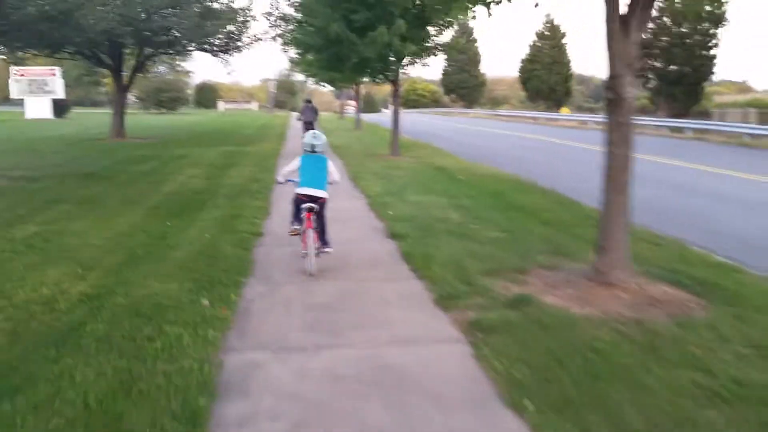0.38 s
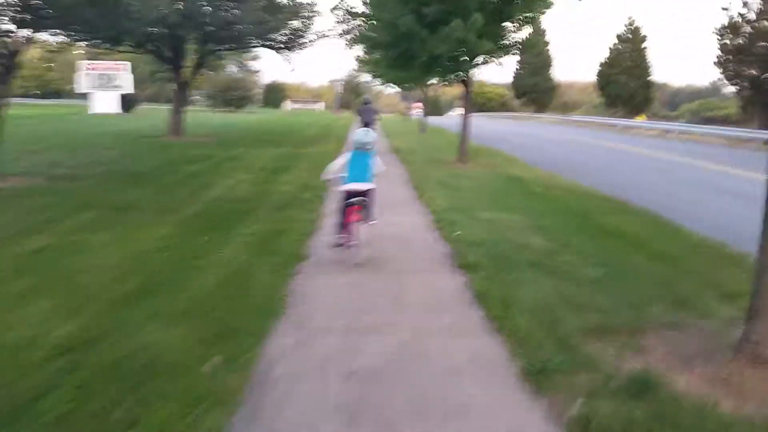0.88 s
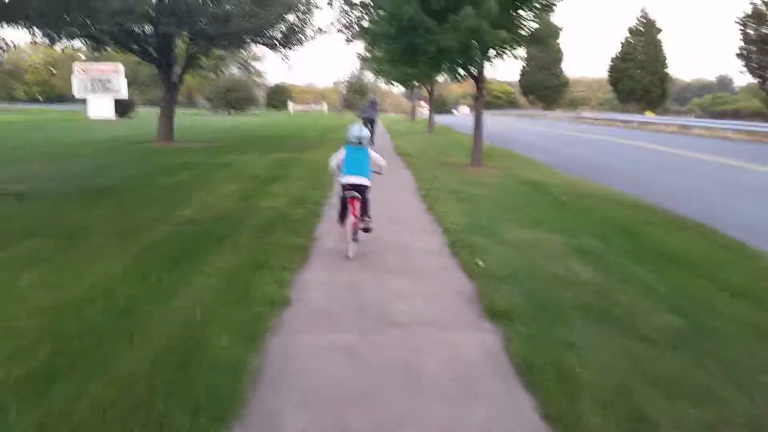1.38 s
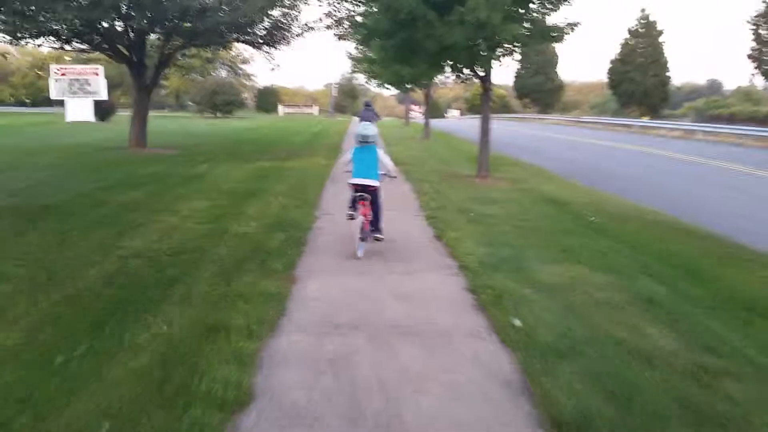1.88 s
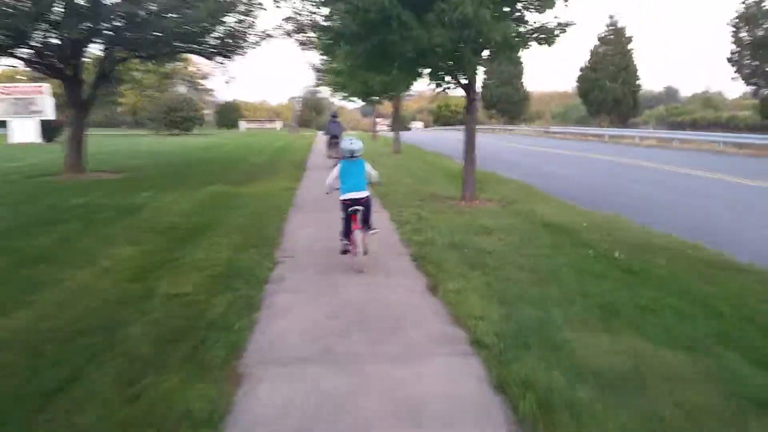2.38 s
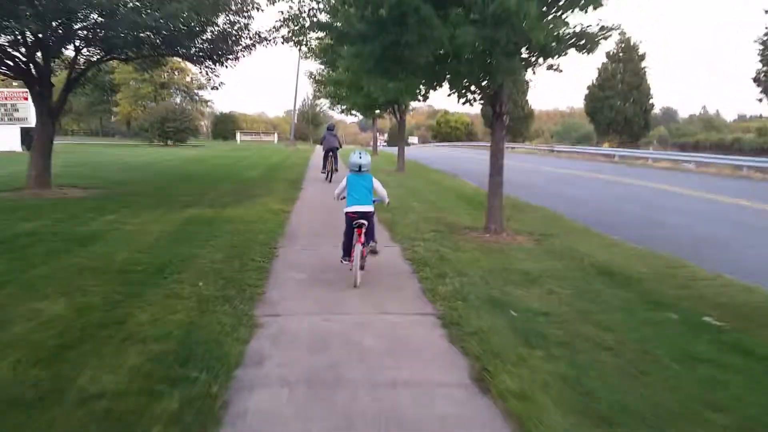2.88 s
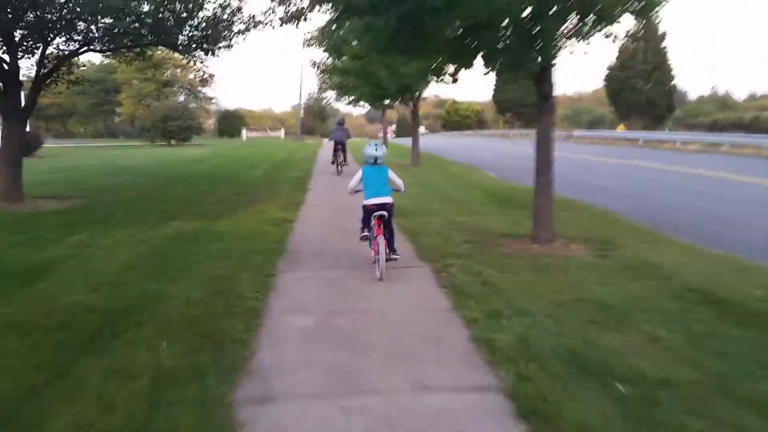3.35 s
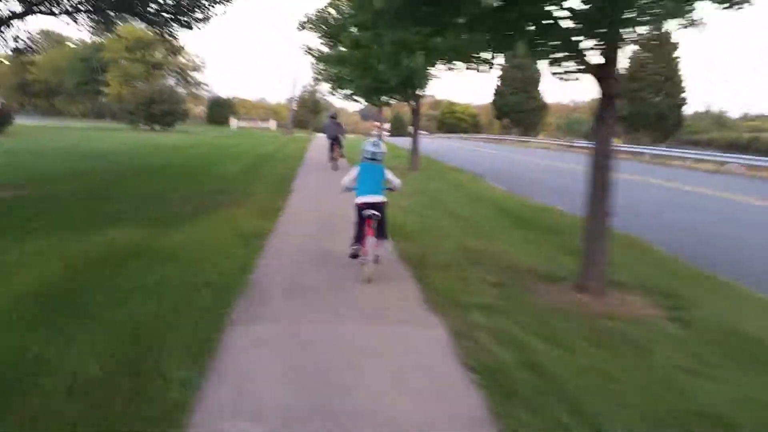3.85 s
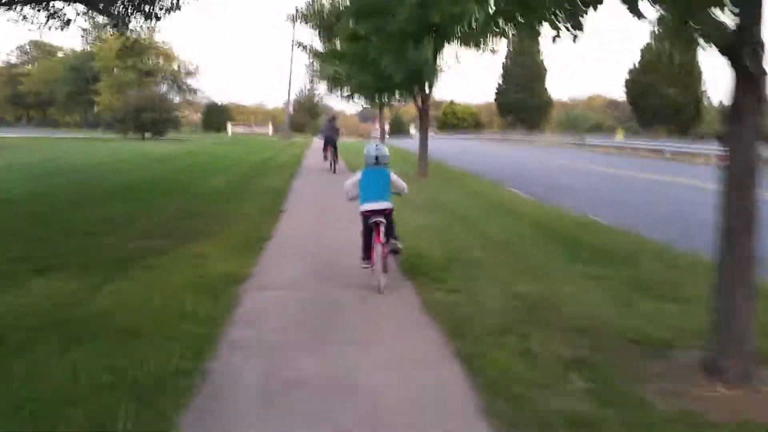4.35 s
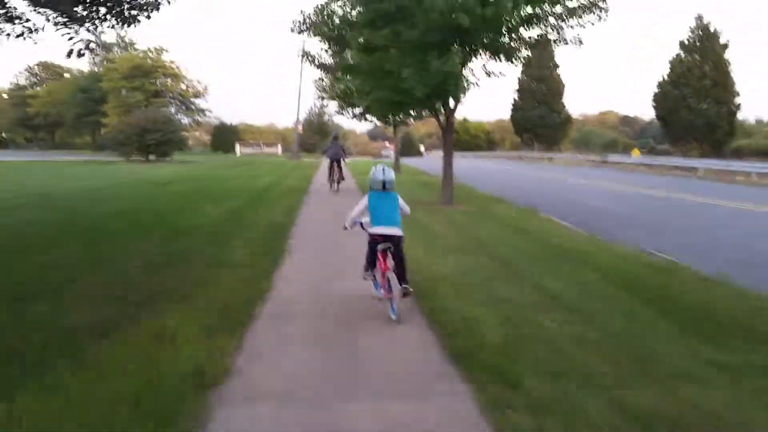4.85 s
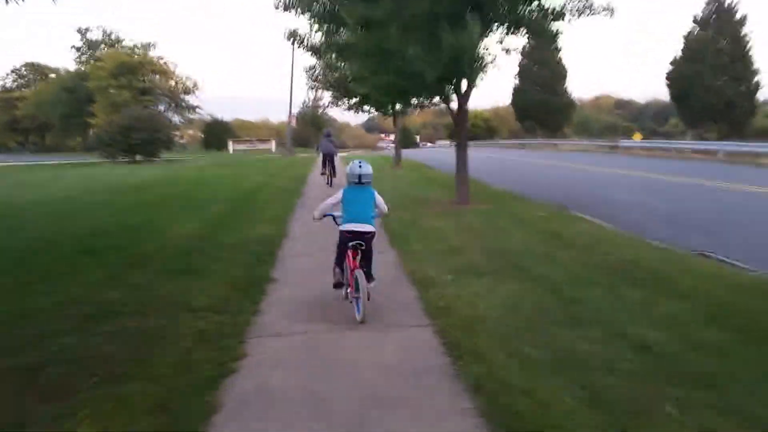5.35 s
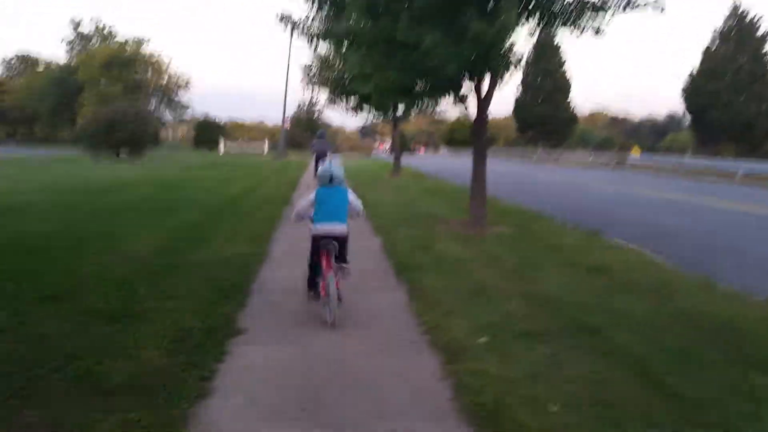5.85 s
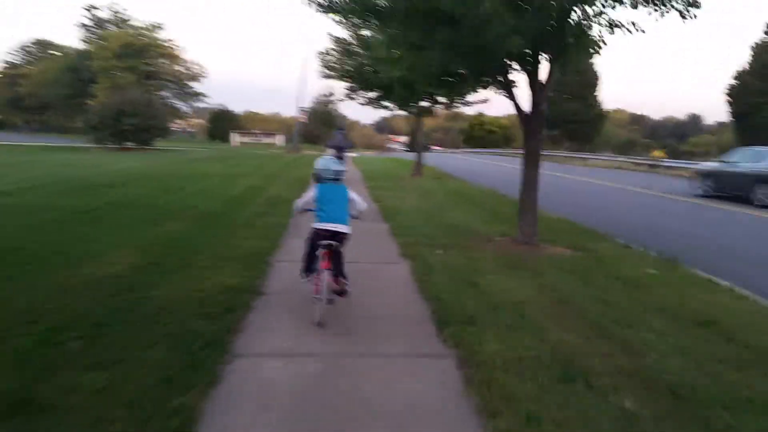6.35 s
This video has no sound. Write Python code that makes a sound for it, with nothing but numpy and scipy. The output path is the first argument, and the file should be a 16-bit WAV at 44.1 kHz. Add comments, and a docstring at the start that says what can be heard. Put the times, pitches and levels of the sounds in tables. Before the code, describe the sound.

A loud deep-throated engine drones past on the road, its pitch sagging, while a bicycle's chain rustles, ticks and snaps over steady tyre roar.

```python
"""Drive-by heard from a bicycle

A loud eight-cylinder vehicle passes: sine orders of its engine cycle, bent down in pitch by the pass.
A fainter engine follows; tyres rumble, roar and hiss as shaped noise. The microphone pair rides on a
bicycle on the sidewalk: the chain rustles and ticks, a joint squeaks very high by stick-slip, one part
snaps, joints in the pavement jolt it, wind buffets it. Crickets trill in narrow pulsing noise bands."""
import sys
import numpy as np
from scipy import signal
from scipy.fft import rfft, irfft, next_fast_len
from scipy.io import wavfile
from scipy.ndimage import uniform_filter1d, map_coordinates

SR = 44100
rng = np.random.default_rng(int(sys.argv[2]) if len(sys.argv) > 2 else 0)


def transcribe(signal):
    """Save signal, clipped to [-1, 1], as a 16-bit WAV file at the path in sys.argv[1]."""
    frames = np.atleast_2d(signal).T
    limited = np.clip(frames, -1, 1)
    pcm = np.round(limited * 32767).astype(np.int16)
    wavfile.write(sys.argv[1], SR, pcm)


def decibels_to_gain(level_db):
    """Convert a level in decibels to a linear amplitude gain (20 dB per decade)."""
    exponent = np.asarray(level_db, float) / 20
    return 10 ** exponent


N = 296793


def unit(x):
    """x at rms 1."""
    return x / np.sqrt(np.mean(x ** 2) + 1e-20)


def along(points, hz):
    """(Hz, value) points interpolated on a log axis."""
    f, v = np.transpose(points)
    return np.interp(np.log(hz + 1), np.log(f + 1), v)


def curves(rows):
    """One value per sample for each column after the time."""
    s, *cols = np.transpose(rows)
    return [np.interp(np.arange(N) / SR, s, c) for c in cols]


def wobble(knots_per_s):
    """A smooth random curve through normal knots."""
    return map_coordinates(rng.standard_normal(N // 100), [np.arange(N) * knots_per_s / SR])


def bell(centre_s, half_s):
    """A swell of height 1, down to 1/e at half_s either side."""
    return np.exp(-((np.arange(N) / SR - centre_s) / half_s) ** 2)


def filtered(x, response):
    """x times a complex response of frequency."""
    m = next_fast_len(N + 8192)
    return irfft(rfft(x, m) * response(np.fft.rfftfreq(m, 1 / SR)), m)[..., :N]


def rush(spectrum, alike, patchy_db):
    """Stereo noise of rms 1: patches of random gain, a spectrum, a left-right likeness by frequency."""
    z = signal.stft(rng.standard_normal((2, N)), nperseg=512)[2]
    field = uniform_filter1d(rng.standard_normal(z.shape[1:]), size=4, axis=0)
    field = uniform_filter1d(field, size=16, axis=1)
    pair = signal.istft(z * decibels_to_gain(patchy_db * unit(field)), nperseg=512)[1][:, :N]

    def mid_side(hz):
        turn = np.arccos(np.clip(along(alike, hz), -1, 1)) / 2
        return decibels_to_gain(along(spectrum, hz)) * [np.cos(turn), np.sin(turn)]

    mid, side = filtered(pair, mid_side)
    return unit(np.array([mid + side, mid - side]))


def narrow(hz, half_width_hz):
    """Stereo noise of rms 1 in a narrow band: slow noise on a carrier of fixed or moving pitch."""
    slow = filtered(rng.standard_normal((2, 2, N)), lambda f: np.exp(-(f / half_width_hz) ** 2))
    phase = 2 * np.pi * np.cumsum(hz + np.zeros(N)) / SR
    return unit(slow[0] * np.cos(phase) + slow[1] * np.sin(phase))


def exhaust():
    """Orders of the engine cycle, Doppler-bent; the weak orders flicker most on their way through the air."""
    # firing tone: opens up near 2 s, then fades in and out as reflections interfere: t/s, level/dB
    firing_level = [(0, -22), (.5, -24), (.9, -21.5), (1.3, -39), (1.55, -25), (1.8, -25.5), (2.0, -14),
                    (2.2, -12), (2.58, -14), (2.72, -11.5), (3.0, -12), (3.42, -10), (3.7, -15),
                    (3.82, -12.5), (4.15, -13), (4.48, -21.5), (4.6, -14), (4.95, -14), (5.2, -19),
                    (5.4, -19), (5.5, -23.5), (5.6, -16), (5.7, -23.5), (5.9, -16.5), (6.1, -22),
                    (6.3, -24), (6.5, -17), (6.73, -27.5)]
    # octave of the firing tone: t/s, level/dB
    octave_level = [(0, -45.5), (1.8, -47), (2.5, -38), (3.0, -29), (3.5, -28), (3.9, -34.5), (4.3, -41),
                    (4.9, -31.5), (5.25, -40.5), (5.55, -31.5), (6.0, -34), (6.73, -42)]
    # uneven cylinders sound orders of the cycle (eight firings): order, level in its group/dB
    low_orders = [(3, -10.5), (4, -9), (5, 0), (6, -19), (7, 2)]
    next_orders = [(9, -1), (10, -18.5)]
    high_orders = [(11, -9.5), (12, -11.5), (13, -1.5), (14, -7), (15, -5.5), (17, -8), (19, -13),
                   (21, -15.5)]
    # low, next, high group: level when passing/dB, share of the firing tone's swings [1],
    # share of the distance loss [1], gain behind the tailpipe/dB
    group_rules = [(-28.5, .45, 0.38, 1.5), (-26, 0.55, 0.24, 1.5), (-34, 0.35, 0.56, 2.5)]
    pass_s, speed_m_s, miss_m, sound_m_s = 3.1, 34, 26, 343  # speed relative to the bicycle
    firing_at_pass_hz, sag_hz_per_s = 136.4, 0.1  # at the source; revs sag slowly
    waver, flutter_db, scatter_db, drift_db = 0.003, 1.26, 2, 2.1

    t = np.arange(N) / SR - pass_s
    range_m = np.hypot(speed_m_s * t, miss_m)
    behind = speed_m_s * t / range_m  # -1 approaching, 1 receding
    loss_db = 20 * np.log10(miss_m / range_m)
    firing_hz = (firing_at_pass_hz - sag_hz_per_s * t) / (1 + behind * speed_m_s / sound_m_s)
    cycle_phase = 2 * np.pi * np.cumsum(firing_hz * (1 + waver * wobble(12))) / SR / 8

    def order(k, db, flicker_db):
        level = np.sqrt(2) * decibels_to_gain(db + flicker_db * wobble(9.8))
        return level * np.sin(k * cycle_phase + rng.uniform(0, 2 * np.pi))

    tone_db, octave_db = curves(firing_level)[0], curves(octave_level)[0]
    swing_db = tone_db - tone_db.max()
    drone = order(8, tone_db, flutter_db) + order(16, octave_db, flutter_db)
    for orders, rule in zip((low_orders, next_orders, high_orders), group_rules):
        pass_db, follow, fade, rear_db = rule
        group_db = pass_db + follow * swing_db + fade * loss_db + rear_db * behind
        group_db = group_db + drift_db * wobble(3.0)
        drone += sum(order(round(k), group_db + db, scatter_db) for k, db in orders)
    return drone


def second_engine():
    """A fainter engine nearly keeps its pitch behind the first: one flickering sine at its firing rate."""
    # t/s, firing f/Hz, level/dB
    firing = [(0, 148, -66.5), (3.8, 148, -55.5), (4.1, 147.5, -28), (4.8, 147.6, -30.5), (5.3, 147, -27.5),
              (5.7, 146, -34.5), (6.1, 144, -30.5), (6.73, 145, -56.5)]
    hz, db = curves(firing)
    return np.sqrt(2) * decibels_to_gain(db + 1.8 * wobble(6.6)) * np.sin(2 * np.pi * np.cumsum(hz) / SR)


def road():
    """Tyres on asphalt: noise in rumble, roar and hiss bands that swell together with the traffic."""
    # t/s, roar level/dB
    traffic = [(0.0, -29.5), (0.03, -34), (1.67, -32), (2.75, -33.5), (3.02, -31.5), (3.37, -34),
               (3.67, -30.5), (5.21, -30), (5.36, -29.5), (6.73, -33)]
    # relative spectra: f/Hz, density/dB per Hz
    rumble_spectrum = [(15, -23), (30, -5), (50, 0), (100, 7), (200, 4.5), (300, -5.5), (420, -17.5),
                       (900, -52)]
    roar_spectrum = [(190, -29), (320, -6.5), (349, -2.5), (548, 0), (636, 3), (891, 3.5), (1130, 1),
                     (1600, -8), (2080, -40), (3520, -120)]
    hiss_spectrum = [(820, -17.5), (1400, 0), (1580, -4.5), (1730, -1), (2030, -6), (3670, -19.5),
                     (4610, -21), (5140, -28.5), (7000, -54), (9100, -70), (15400, -120)]
    # f/Hz, left-right likeness [1]
    likeness = [(40, 1), (130, 0.93), (300, 1), (600, 1), (1200, .6), (2500, 0.1), (5000, 0.13)]
    rumble_mean_db, rumble_follow, hiss_mean_db, hiss_follow = -27.5, 0.3, -41, 1  # follow: the roar's swings

    roar_db, = curves(traffic)
    busy_db = roar_db - roar_db.mean()
    rumble_db = rumble_mean_db + rumble_follow * busy_db + 0.1 * wobble(2.5)
    quiet_car_db = 2 * bell(6.46, 0.57)  # a quiet car draws level and lifts the hiss
    hiss_db = hiss_mean_db + hiss_follow * busy_db + quiet_car_db + 0.44 * wobble(4.4)
    rumble = decibels_to_gain(rumble_db) * rush(rumble_spectrum, likeness, patchy_db=0.4)
    roar = decibels_to_gain(roar_db) * rush(roar_spectrum, likeness, patchy_db=0.77)
    hiss = decibels_to_gain(hiss_db) * rush(hiss_spectrum, likeness, patchy_db=1.08)
    return rumble + roar + swells() + hiss


def swells():
    """Hollow swells in the roar: narrow noise bands that grow, glide and fade."""
    # t/s, half length/s, f/Hz, glide/Hz per s, mid level/dB
    bands = [(1.45, .31, 880, -60, -39), (2.304, 0.44, 651, 20, -40), (3.047, .26, 747, 331, -35.5),
             (3.65, 0.22, 671, 30, -37), (4.206, 0.52, 945, 100, -41.5), (4.493, .16, 679, -38, -37.5),
             (5.099, .2, 898, 17.5, -37), (5.5, 0.14, 720, -200, -35.5)]
    out, t = np.zeros((2, N)), np.arange(N) / SR
    for s, half_s, hz, glide, db in bands:
        mid, side = narrow(hz + glide * np.clip(t - s, -1, 1), half_width_hz=hz / 12)
        out += decibels_to_gain(db) * bell(s, half_s) * (mid + 0.29 * np.array([side, -side]))
    return out


def chain():
    """Noise rustle grained by tiny link clicks follows the pedalling, over the hiss of air and leaves."""
    # relative spectra: f/Hz, density/dB per Hz
    rustle_spectrum = [(5000, -29), (9000, -14), (11500, -1), (13500, 5), (15800, 3)]
    air_spectrum = [(4500, -23.5), (6000, 1), (8000, 5.5), (12000, 12), (15800, 7.5)]
    # pushes on the pedals load the chain: t/s, half length/s, rustle level/dB
    pushes = [(0, .12, -57.5), (.33, .15, -62.5), (0.978, .2, -61.5), (2.2, .25, -59.5), (2.553, .08, -63),
              (3.102, .15, -65.5), (4.296, .25, -53.5), (4.55, .18, -57), (5.301, .3, -59),
              (5.901, .2, -58.5), (6.336, .17, -55)]
    # hiss of air and leaves: t/s, level/dB
    breeze = [(0, -56), (.6, -65.5), (1.5, -68.5), (2.3, -65), (3.1, -59), (3.5, -64), (4.3, -57.5),
              (4.8, -58.5), (5.4, -55), (6.05, -62), (6.73, -59.5)]
    clicks_per_s, spread_db, click_share, click_t60_s, coast_db = 70, 4, .4, .012, -71

    clicks = (rng.random(N) < clicks_per_s / SR) * decibels_to_gain(spread_db * rng.uniform(-1, 1, N))
    decay = decibels_to_gain(-60 * np.arange(600) / SR / click_t60_s)
    grain = 1 + click_share * unit(np.convolve(clicks, decay)[:N])
    noise = rush(rustle_spectrum, [(9000, .3)], patchy_db=1.5)
    rustle = unit(grain * decibels_to_gain(1.5 * wobble(25)) * noise)
    load = decibels_to_gain(coast_db) + sum(decibels_to_gain(db) * bell(s, half_s) for s, half_s, db in pushes)
    air = rush(air_spectrum, [(9000, .05)], patchy_db=.4)
    return load * rustle + decibels_to_gain(curves(breeze)[0]) * air


def ticks():
    """Chain and frame contacts: a noise puff and a short ring of small metal parts, unlike at each port."""
    # t/s, puff level before colouring/dB, puff t60/s
    contacts = [(0.8064, -32.5, .006), (.8692, -30.5, 0.0089), (1.079, -38.5, .006), (2.2566, -42, .006),
                (2.7453, -34, 0.0051), (3.564, -36.5, .006), (4.3142, -27, .006), (4.3189, -15, 0.0093),
                (4.3221, -24, 0.016), (4.3284, -36.5, .008), (4.376, -37, .008), (5.003, -33, 0.01),
                (5.1152, -30.5, 0.0083), (5.155, -38, .008), (5.244, -32, .008), (5.376, -39.5, 0.0069),
                (5.472, -35, 0.015), (5.6053, -33.5, 0.0043), (6.323, -33.5, 0.0087)]
    # modes of the small metal parts: f/Hz, relative level/dB, t60/s
    metal = [(4730, -14, .007), (8950, -14.5, 0.011), (11900, -6, .005), (13400, 1, .006),
             (14300, 0.5, .006), (15400, -4.5, .006)]
    # colour of the contact noise: f/Hz, gain/dB
    puff_colour = [(2500, -33.5), (4500, -7.5), (7000, -12.5), (10000, -3), (13000, 2.5), (16000, -0.5)]

    rings, puffs = np.zeros((2, N + SR)), np.zeros((2, N + SR))
    t = np.arange(SR // 20) / SR
    rise = 1 - np.exp(-t / .0005)
    for s, db, t60_s in contacts:
        ring = np.zeros((2, len(t)))
        for hz, mode_db, mode_t60_s in metal:
            port_db, port_phase = rng.standard_normal((2, 2, 1)) * [[[2.5]], [[.8]]]
            level = decibels_to_gain(mode_db + port_db - 60 * t / mode_t60_s)
            ring += level * np.sin(2 * np.pi * hz * t + port_phase)
        mid, side = rng.standard_normal((2, len(t)))
        puff = mid + .5 * np.array([side, -side])
        ring_share = np.clip((db + 40) / 25, .1, 1)  # light touches hardly set the metal ringing
        at = slice(round(s * SR), round(s * SR) + len(t))
        rings[:, at] += decibels_to_gain(db - 4) * ring_share * ring * rise
        puffs[:, at] += decibels_to_gain(db - 60 * t / abs(t60_s)) * puff * rise
    return rings[:, :N] + filtered(puffs[:, :N], lambda hz: decibels_to_gain(along(puff_colour, hz)))


def squeaks():
    """Fast stick-slip of a joint: four high harmonics of a trembling slip rate, nearer the right port."""
    # drive level/dB, strongest harmonic [number], path of (t/s, slip rate f/Hz)
    slips = [(-68, 8, [(.4, 1675), (.445, 1570), (.47, 1516)]), (-62, 8, [(2.01, 1684), (2.03, 1805),
             (2.07, 1810), (2.113, 1900), (2.153, 1690), (2.176, 1945), (2.205, 1830), (2.235, 1975),
             (2.295, 2040), (2.325, 1950), (2.375, 1640), (2.43, 1450)]), (-62, 8, [(2.48, 1460),
             (2.505, 1555), (2.525, 1530), (2.55, 1411)]), (-57, 7, [(4.06, 1560), (4.085, 1680),
             (4.108, 1900), (4.14, 1914), (4.155, 1964), (4.17, 1900), (4.2, 1600)]),
             (-58.5, 8, [(4.51, 1575), (4.58, 1555), (4.612, 1925), (4.65, 1574), (4.668, 1710),
             (4.715, 1240)]), (-58.5, 8, [(6.22, 1940), (6.25, 1890), (6.28, 2100), (6.3, 2150),
             (6.33, 1960), (6.355, 1937), (6.395, 1650), (6.425, 1800), (6.455, 1700), (6.485, 1700),
             (6.505, 1780), (6.53, 1700), (6.57, 1700), (6.59, 1440)])]
    # the joint radiates only very high: f/Hz, gain/dB
    body = [(9500, -30), (11200, -1), (13000, 0), (16000, 0)]
    harmonic_db = [-8, -8, 0, -13]  # two below the strongest, itself, one above

    out, t = np.zeros(N), np.arange(N) / SR
    tremble_hz = 8 * wobble(350)
    flicker_db = 3 * np.array([wobble(140) for k in range(4)])
    flicker_db += 5 * np.array([wobble(14), wobble(14), .3 * wobble(14), wobble(14)])  # come and go
    for db, strongest, path in slips:
        s, hz = np.transpose(path)
        on = slice(round(s[0] * SR), round(s[-1] * SR))
        phase = 2 * np.pi * np.cumsum(np.interp(t[on], s, hz) + tremble_hz[on]) / SR
        fade = signal.windows.tukey(len(phase), .1)
        for k, rel_db in enumerate(harmonic_db):
            level = np.sqrt(2) * decibels_to_gain(db + rel_db + flicker_db[k, on])
            out[on] += level * np.sin((round(strongest) + k - 2) * phase) * fade
    return filtered(out, lambda f: decibels_to_gain(along(body, f))) * decibels_to_gain([[-8], [0]])


def bumps():
    """Wheels over pavement joints: a decaying low sine push with a dull knock of the frame."""
    # t/s, push level/dB, relative knock strength [1]
    jolts = [(1.262, -14, 0.32), (1.293, -10.5, 0.11), (1.386, -19.5, 0.57), (1.393, -15, 0.54),
             (1.482, -18, 0.18), (1.532, -18.5, 0.15)]
    push_hz, push_t60_s, knock_hz, knock_t60_s = 130, 0.06, 400, 0.016
    out, t = np.zeros(N), np.arange(SR // 10) / SR
    push = np.sin(2 * np.pi * push_hz * t)
    thud = decibels_to_gain(-60 * t / knock_t60_s) * np.sin(2 * np.pi * knock_hz * t)  # the push decay shortens it more
    for s, db, knock in jolts:
        out[round(s * SR):][:len(t)] += decibels_to_gain(db - 60 * t / push_t60_s) * (push + 1.6 * knock * thud)
    return out


def crickets():
    """Near singers trill in narrow bands, pulsing with their wing strokes, over a wide steady chorus."""
    # t/s, half length/s, f/Hz, level/dB
    trills = [(.58, 0.23, 4520, -54.5), (1.1, .15, 4640, -59), (1.8, 0.25, 4580, -57),
              (2.63, 0.18, 4460, -57), (4.15, .3, 4530, -58.5), (4.9, 0.32, 4440, -58.5),
              (5.8, .15, 4360, -60), (6.3, .15, 4540, -55.5), (6.72, 0.088, 4380, -57)]
    strokes_hz, depth, chorus_db = 44, 0.17, -62
    stroke_phase = 2 * np.pi * np.cumsum(strokes_hz * (1 + .08 * wobble(6))) / SR
    strokes = 1 + depth * np.sin(stroke_phase)
    near = sum(decibels_to_gain(db) * bell(s, half_s) * narrow(hz, half_width_hz=130) for s, half_s, hz, db in trills)
    return strokes * near + decibels_to_gain(chorus_db) * narrow(4500, half_width_hz=390)


def headwind():
    """The air of the ride buffets each port almost on its own: gusting low noise."""
    # relative spectrum: f/Hz, density/dB per Hz
    buffet = [(12, -20.5), (30, -2), (60, 1.5), (110, -10), (250, -43)]
    return decibels_to_gain(-42 + 2.8 * wobble(3.06)) * rush(buffet, [(40, 0.043)], patchy_db=3.5)


def scene():
    """Road sounds arrive from the right, so later at the left port; the bicycle is all around."""
    lag_s, side = 1.3e-4, np.array([[-1], [1]])
    traffic = exhaust() + second_engine() + road()
    traffic = filtered(traffic, lambda hz: np.exp(1j * np.pi * hz * lag_s * side))
    return traffic + crickets() + chain() + ticks() + squeaks() + bumps() + headwind()


def roll_off(x):
    """The treble ends steeply here."""
    return signal.sosfilt(signal.butter(12, 16500, fs=SR, output="sos"), x)


def record(dry):
    """Each microphone port has its own resonance; nothing passes above the band limit."""
    # port responses: f/Hz, gain/dB
    left_port = [(60, 1), (150, -0.55), (400, 2.5), (800, 1.5), (3000, 4.5), (6200, -1.5), (7500, 0),
                 (8400, 12), (9000, 15.5), (9700, 8.5), (10800, 1.5), (13500, -3), (15800, -2.5)]
    right_port = [(60, 1.5), (150, 1.07), (400, 1.5), (800, -0.85), (3000, 3), (6200, -1), (7500, -8),
                  (11000, -10), (12000, -5), (14000, -1.5), (15800, 2.5)]
    top_hz = 15830
    mix = filtered(dry, lambda hz: decibels_to_gain([along(left_port, hz), along(right_port, hz)]) * (hz < top_hz))
    return roll_off(mix)


dry = scene()
out = record(dry)
transcribe(out)
```